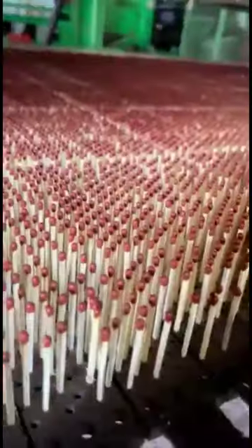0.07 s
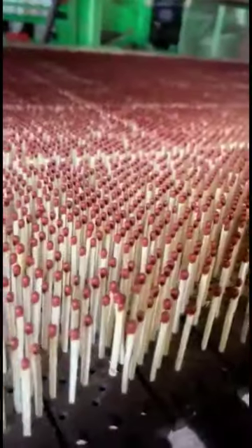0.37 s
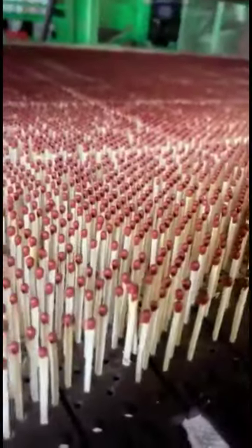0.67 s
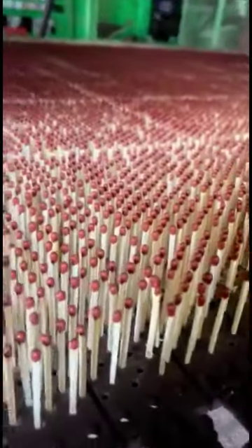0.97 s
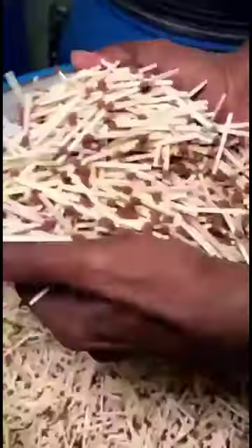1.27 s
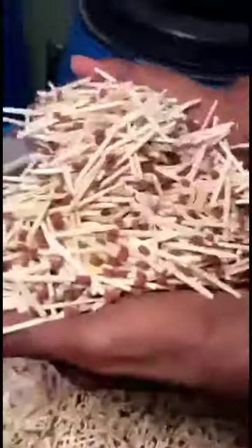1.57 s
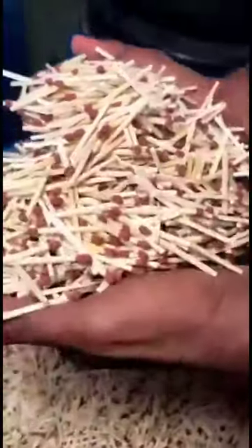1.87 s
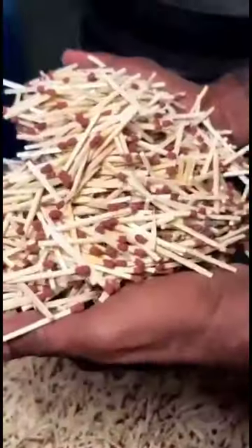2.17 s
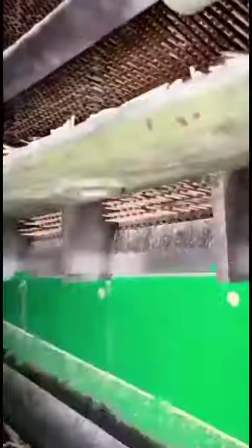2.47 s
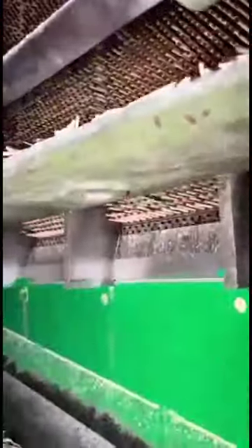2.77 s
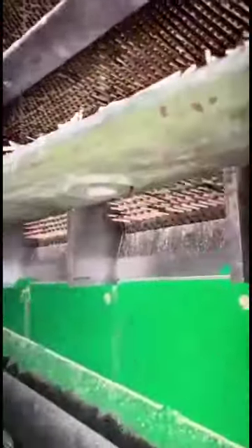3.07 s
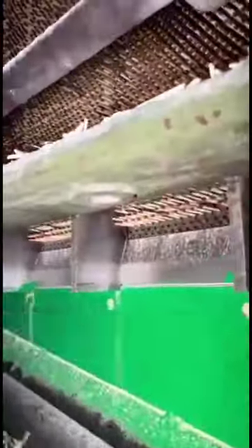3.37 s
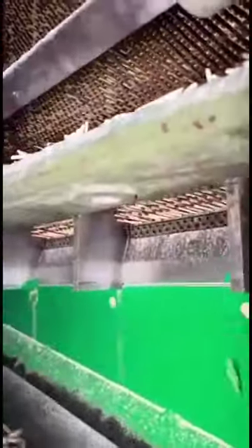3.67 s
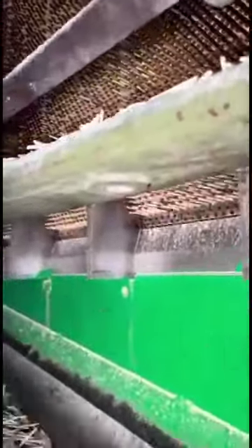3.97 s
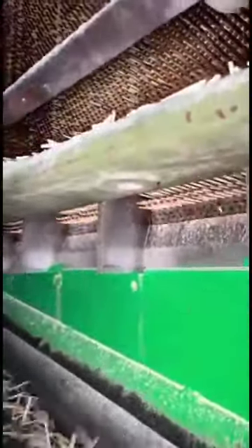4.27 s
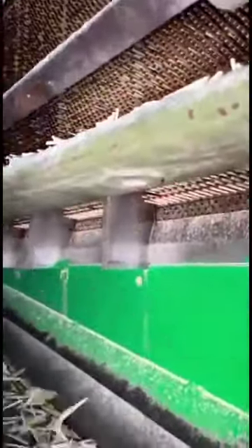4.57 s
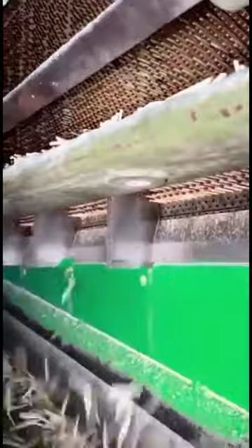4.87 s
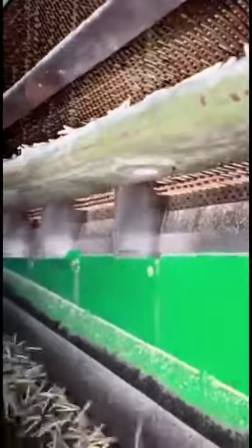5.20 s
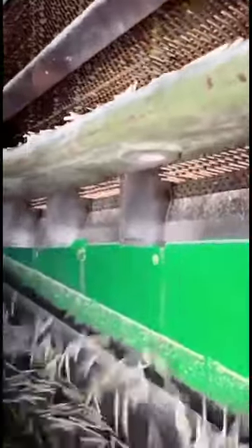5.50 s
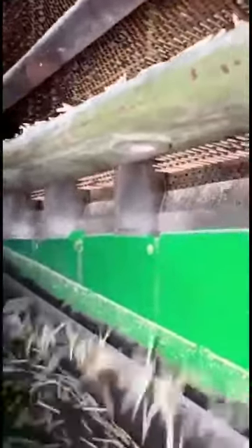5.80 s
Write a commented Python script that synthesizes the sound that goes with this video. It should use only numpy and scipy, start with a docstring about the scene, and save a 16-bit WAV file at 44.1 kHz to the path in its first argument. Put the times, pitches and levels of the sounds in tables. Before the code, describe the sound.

Steady machine clatter fills a factory hall, with a low conveyor hum, scattered knocks and the light rustle of matchsticks under a thin high whine. About halfway through, the microphone is suddenly beside a machine punching matches out of metal plates. It shakes and rattles back and forth in a quick rhythm, with deep thuds, cracking steel hits and ticking sticks. The bass sits in the middle while the highs spread wide.

```python
"""A match factory, three spots in a row: beside the humming conveyor of dipped splints, at a heap of
loose matches lifted by hand, then close to the ejector. Its bar punches rows of matches out of their
plates about three times a second: steel clacks, thuds in the frame and two surges of rattle per stroke.
At the first two spots the machines all round the hall drum and clatter. The stereo microphone hears
the bass in the middle and the treble spread wide."""
import sys
import numpy as np
from scipy import signal
from scipy.fft import rfft, irfft, next_fast_len
from scipy.io import wavfile
from scipy.ndimage import uniform_filter1d

SR = 44100
rng = np.random.default_rng(int(sys.argv[2]) if len(sys.argv) > 2 else 0)


def transcribe(u):
    """Save the signal u as a 16-bit wav file named by the first command-line argument.

    u: samples, shape (n,) or (channels, n), limited to [-1, 1]; the rate is SR.
    q: integer samples, one column per channel.
    """
    v = np.clip(np.atleast_2d(u).T, -1, 1)
    q = np.round(v * 32767).astype(np.int16)
    wavfile.write(sys.argv[1], SR, q)


N = 257544
TIME_S = np.arange(N) / SR
TO_HEAP_S, TO_EJECTOR_S = 1.511, 2.54   # the microphone changes spot

# spectrum of the ejector's chain, plates and splints, close up: frequency_hz, gain_db
EJECTOR_RATTLE = [(500, 11.5), (750, 1), (900, 3), (1500, -1.5), (2000, -4), (2700, -6.5), (3500, -6),
                  (5000, -8), (6300, -10), (7500, -14), (11000, -17.5), (13000, -23), (15500, -33)]


def ejector():
    """Close up: each stroke shakes the frame and sets it rattling, once out and once back."""
    # effort of each stroke in turn: push_shake_db, pull_shake_db, push_rattle_db, pull_rattle_db
    strokes = [(-0.5, 0, -10, 3), (2, 4, 1, -0.5), (1, -2, 0, -2.5), (-2, 0.5, 1, 0.5), (-2.5, 2.5, 0, -1),
               (0, -0.5, 1, -1), (0, 2, -2, -0.5), (1, -3.5, -2, -6.5), (0.5, -1, 0.5, 2.5),
               (0, 3.5, -1, 0.5), (2, 1, -0.5, -4.5)]
    # spectrum of the drumming frame: frequency_hz, gain_db
    frame_spectrum = [(94, -27), (160, 6.5), (174, 0.5), (205, -13.5), (258, -7), (296, -8), (344, -9.5),
                      (373, -8.5), (443, -19), (527, -15), (773, -18), (900, -17.5), (1170, -55),
                      (1980, -120)]
    # rests between surges: centre_s, depth_db, half_width_s
    lulls = [(3.04, -3.5, 0.045), (4.45, -1, .02), (4.785, -4, 0.033), (5.07, -3.5, .022),
             (5.57, -2, 0.025)]
    shake_db, rattle_db = np.transpose(strokes)[:2], np.transpose(strokes)[2:]
    bass = frame_bass(shake_db)
    drum = contacts(frame_spectrum, per_s=73, size_db=1.5, t60=0.022, wash_db=3)
    drum = steady(cut(cut(drum, 207, "high"), 694, "low", order=6), span_s=0.0333)
    drum *= stroke_gain(shake_db, rest_db=-26.5, out_db=-24.5, back_db=-23.5, lags_s=(0.014, 0.15),
                        attack_s=0.027, hold_s=0.055, release_s=0.072)
    rattle = ejector_rattle(rattle_db)
    lull_db = sum(db * np.exp(-((TIME_S - s) / width) ** 2) for s, db, width in lulls)
    judder = from_db(0.8 * drift(rate_hz=17.4) + lull_db)
    return bass + judder * (drum + rattle)


def ejector_rattle(efforts_db):
    """Chain and plates clatter; above them the splints hiss and tick, and the whine swells along."""
    clatter = contacts(EJECTOR_RATTLE, per_s=260, size_db=1, t60=0.06, wash_db=-2)
    clatter = unit(cut(cut(clatter, 667, "high"), 2310, "low"))
    clatter *= stroke_gain(efforts_db, rest_db=-33, out_db=-29.5, back_db=-32.5, lags_s=(0.0015, 0.171),
                           attack_s=0.0089, hold_s=0.056, release_s=0.038)
    hiss = contacts(EJECTOR_RATTLE, per_s=300, size_db=1.5, t60=0.04, wash_db=-1)
    hiss = unit(cut(hiss, 2350, "high")) * pan(1.4)
    ticking = ticks(EJECTOR_RATTLE, per_s=900, size_db=2.2)
    splints = from_db(-0.5) * hiss + from_db(-3.5) * ticking + from_db(4.5) * whine()
    splints *= stroke_gain(efforts_db, rest_db=-34, out_db=-33, back_db=-33.5, lags_s=(0.0028, 0.16),
                           attack_s=0.013, hold_s=0.039, release_s=0.061)
    return clatter + splints


def frame_bass(efforts_db):
    """Low down the ejector's blows merge into a floor rumble and an unevenly throbbing drone."""
    # spectrum of the shaking frame: frequency_hz, gain_db
    spectrum = [(13, -68), (22, -29), (48, -8), (70, 0.5), (86, 3.5), (113, -9.5), (157, -4.5), (174, -4.5),
                (203, -10), (260, -3.5), (340, -53), (570, -120)]
    # swell of the floor rumble: time_s, level_db
    rumble_swell = [(2.55, -24.5), (2.63, -25), (2.67, -17.5), (2.75, -39), (2.88, -23), (3.12, -41),
                    (3.14, -29), (3.31, -27), (3.33, -33), (3.5, -25), (3.62, -30), (3.64, -39),
                    (3.74, -26), (4.75, -29), (4.8, -47), (4.85, -25), (5.83, -29), (5.84, -28)]
    # swell of the drone: time_s, level_db
    drone_swell = [(2.55, -21), (2.63, -16.5), (2.67, -37), (2.72, -19), (2.79, -26), (2.83, -17),
                   (3.04, -29), (3.1, -17), (3.63, -22.5), (3.65, -28), (3.7, -22.5), (3.88, -18),
                   (3.91, -38), (3.96, -20.5), (5.03, -23.5), (5.08, -36), (5.11, -22), (5.84, -21)]
    shaking = colour(wide_noise(), spectrum)
    rumble_db = in_time(rumble_swell)
    rumble = steady(cut(shaking, 129, "low", order=6), span_s=0.046)
    rumble *= from_db(0.84 * (rumble_db - rumble_db.mean()))
    rumble *= stroke_gain(efforts_db, rest_db=-24.5, out_db=-25, back_db=-24, lags_s=(0.04, 0.167),
                          attack_s=0.032, hold_s=0.021, release_s=0.021)
    drone = steady(cut(cut(shaking, 128.4, "high", order=6), 218, "low", order=6), span_s=0.064)
    throb_db = 1.5 * drift(rate_hz=42)
    return rumble + from_db(in_time(drone_swell) - 3 + throb_db) * drone


def stroke_gain(efforts_db, rest_db, out_db, back_db, lags_s, **shape):
    """A part shakes a little all the time, and surges as the bar goes out and as it comes back."""
    first_s, stroke_s = 2.468, 0.3125
    push_db, pull_db = efforts_db
    starts_s = first_s + stroke_s * np.arange(len(push_db))
    out = surges(starts_s, out_db + push_db, lag_s=lags_s[0], **shape)
    back = surges(starts_s, back_db + pull_db, lag_s=lags_s[1], **shape)
    return np.sqrt(from_db(rest_db) ** 2 + out + back)


def thuds():
    """Heavy blows ring the ejector's frame; the harder, higher ones jolt the loose plates most."""
    # blows in the frame: start_s, level_db, pitch_hz
    blows = [(2.545, -13, 165), (2.599, -11, 154), (2.659, -12, 440), (2.683, -11.5, 235),
             (2.714, -17, 228), (2.73, -10, 150), (2.741, -13, 266), (2.822, -15, 165), (2.832, -12, 341),
             (2.865, -15, 150), (2.958, -8, 354), (3.128, -16.5, 215), (3.209, -11.5, 154),
             (3.268, -9, 345), (3.311, -15.5, 570), (3.38, -12, 266), (3.449, -14, 164),
             (3.461, -12.5, 341), (3.507, -14, 235), (3.583, -15, 165), (3.594, -13, 330),
             (3.706, -12.5, 165), (3.832, -9, 165), (3.903, -15, 311), (3.94, -12, 320), (3.97, -11.5, 340),
             (4.078, -13.5, 164), (4.088, -8.5, 260), (4.218, -13.5, 360), (4.245, -18.5, 509),
             (4.517, -7.5, 265), (4.541, -19, 221), (4.556, -13.5, 520), (4.59, -14, 149),
             (4.599, -11, 362), (4.72, -10, 171), (4.846, -11, 165), (4.901, -16, 258), (4.966, -11, 165),
             (5.347, -16, 283), (5.455, -7, 290), (5.507, -8, 420), (5.625, -11, 160), (5.658, -11, 254),
             (5.724, -14, 166), (5.785, -13, 295)]
    # modes of the frame: pitch_hz, gain_db, t60_s
    frame_modes = [(163.2, -1.5, 0.17), (233.7, 0.5, 0.087), (273, -2, 0.078), (336.7, -1.5, 0.11),
                   (377, -3, 0.09), (508, -6.5, 0.08), (558, -4.5, 0.11), (628, -9, 0.073), (860, 5, 0.077)]
    s, db, pitch_hz = np.transpose(blows)
    plates = unit(cut(colour(wide_noise(), EJECTOR_RATTLE), 2300, "low", order=2))
    shaken = fade(strikes(s, from_db(db) * pitch_hz / pitch_hz.max()), t60=0.21)
    return struck(blows, frame_modes, scatter_db=1) + from_db(-15.5) * shaken * plates


def clacks():
    """The bar hits a row of splints: a ragged crack, a short ring of steel, a tail in the housing."""
    # hits of the bar, each snapping in two broad resonances:
    # start_s, crack_db, low_hz, low_db, high_hz, high_db, width_hz, left_minus_right_db
    bar_hits = [(2.947, -27, 3000, -31, 4000, -33, 1200, 0), (3.095, -27.5, 3550, -28.5, 5900, -34, 600, 2),
                (3.398, -27.5, 2680, -22, 5970, -22, 1500, 6), (3.718, -27, 3500, -26, 5000, -33, 700, -2),
                (4.031, -14.5, 3520, -15, 6230, -21.5, 650, 4),
                (4.338, -16, 3600, -22, 4450, -17.5, 950, 0), (4.655, -20, 3400, -26, 6370, -23, 1100, 0),
                (4.962, -22, 3260, -27, 5500, -31, 1100, 0), (5.597, -25, 3530, -28, 6300, -33, 700, -2)]
    # modes of the steel bar: pitch_hz, gain_db, t60_s
    bar_modes = [(3620, -6, 0.07), (4500, 1, 0.028), (5070, 3, 0.05), (6600, -9, 0.03), (12300, -16, 0.027)]
    # spectrum of the crack: frequency_hz, gain_db
    crack_spectrum = [(300, -7), (2600, -1), (3200, -6), (6500, 0), (7800, -4), (8600, 16), (10500, -1),
                      (12000, -3), (15500, -16)]
    s, db = np.transpose(bar_hits)[:2]
    hits = strikes(s, from_db(db))
    burst = np.sqrt(surges(s, db - 1.5, attack_s=0.0005, hold_s=0.004, release_s=0.005))
    direct = burst * rng.standard_normal(N)
    housing = (from_db(-8) * burst + from_db(-15) * fade(hits, t60=0.22)) * rng.standard_normal((2, N))
    crack = from_db(-5) * cut(colour(direct + housing, crack_spectrum), 2300, "high")
    row = fade(hits, t60=0.014) * wide_noise()   # the splints are not met all at once
    steel = from_db(-28) * sum(ring(row * from_db(gain_db), hz, t60) for hz, gain_db, t60 in bar_modes)
    snaps = sum(snap(at, low_hz, low_db, width_hz, pan_db) + snap(at, high_hz, high_db, width_hz, pan_db)
                for at, _, low_hz, low_db, high_hz, high_db, width_hz, pan_db in bar_hits)
    return crack + steel + snaps


def snap(start_s, hz, db, width_hz, pan_db, t60=0.05):
    """A row of splints snaps close to the microphone: a short burst in one broad resonance."""
    mid, side = rng.standard_normal((2, SR // 8))
    grit = (mid + from_db(-9) * side * [[1], [-1]]) * pan(pan_db)
    envelope = from_db(db - 60 * np.arange(len(mid)) / SR / t60)
    band = cut(grit * envelope, [max(hz - width_hz / 2, 100), hz + width_hz / 2], "band", order=2)
    burst = unit(band) * np.sqrt(np.mean(envelope ** 2))
    return np.pad(burst, [(0, 0), (int(start_s * SR), N)])[:, :N]


def jolts():
    """The whole ejector bounces on its feet."""
    # jolts that reach the floor: start_s, pitch_hz, peak_db
    bounces = [(2.652, 57.6, -18), (2.867, 61, -23), (3.499, 60.6, -14.5), (4.085, 69, -21),
               (5.162, 70, -14)]
    return sum(ring(strikes([s], from_db(db)), hz, t60=0.46) for s, hz, db in bounces)


def squeaks():
    """Brief rubs, likely in the guides, excite a narrow resonance."""
    # rubs: centre_s, pitch_hz, level_db, length_s
    rubs = [(2.63, 4230, -32.5, 0.06), (3.308, 6270, -36, 0.032), (5.128, 4100, -32.5, 0.052),
            (5.185, 6300, -35, 0.018)]
    out = np.zeros((2, N))
    for s, hz, db, length_s in rubs:
        envelope = from_db(db) * np.exp(-(2 * (TIME_S - s) / length_s) ** 2)
        out += envelope * unit(ring(wide_noise(), hz, t60=0.012))
    return out


def taps():
    """Bunches of splints knock on the plates: each a dry burst in a broad resonance of its own."""
    # knocks at all three spots: start_s, level_db, pitch_hz
    knocks = [(0.256, -24, 1590), (0.689, -29, 1500), (1.178, -25, 1480), (2.202, -31, 1996),
              (2.745, -23, 1600), (2.78, -26.5, 3730), (2.948, -24, 1700), (3.115, -21.5, 1400),
              (3.428, -20.5, 1200), (3.632, -26, 1700), (3.884, -34, 3040), (4.086, -27, 2600),
              (4.365, -26, 1700), (4.403, -23, 1900), (4.523, -26, 1500), (4.546, -29, 5140),
              (4.56, -28, 1800), (4.828, -29, 3830), (4.872, -28, 1900), (4.944, -26, 3450),
              (5.03, -27, 900), (5.141, -27, 4030), (5.461, -24, 2400), (5.631, -25, 1600)]
    grit = wide_noise()
    bursts = sum(fade(strikes([s], from_db(db)), t60=0.05) * unit(ring(grit, hz, t60=4 / hz))
                 for s, db, hz in knocks)
    return cut(bursts, 6800, "low")


def ticks(spectrum, per_s, size_db, t60=0.032, pitches=48):
    """Splints and pins tick at random, each with a short ring at its own pitch and place."""
    out = np.zeros((2, N))
    for hz in np.geomspace(1100, 7400, pitches) * (1 + rng.normal(0, 0.012, pitches)):
        when, chance, sign = rng.random((400, 3)).T
        played = np.arange(len(when)) < per_s * N / SR / pitches
        heights = played * np.sign(sign - 0.5) * from_db(size_db * -np.log(chance + 0.03))
        clicks = strikes(when * N / SR, heights)
        angle = rng.uniform(-0.35, np.pi / 2 + 0.35)
        place = np.array([[np.cos(angle)], [np.sin(angle)]])
        out += from_db(at_hz(spectrum, hz)) * np.sqrt(hz) * place * ring(clicks, hz, t60)
    return unit(out)


def conveyor_bumps():
    """Beside the conveyor: its carriers bump over their track and ring its bed."""
    # bumps of the carriers: start_s, level_db, pitch_hz
    bumps = [(0.227, -17, 240), (0.337, -16.5, 181), (0.438, -16.5, 290), (0.556, -19, 170),
             (0.597, -18, 181), (0.673, -18.5, 210), (0.729, -13.5, 220), (0.753, -18, 350),
             (0.845, -17, 210), (0.862, -15, 320), (1.108, -13.5, 280), (1.153, -14.5, 290),
             (1.31, -17, 230), (1.366, -19, 260), (1.45, -18.5, 160), (1.476, -12, 210)]
    # modes of the bed: pitch_hz, gain_db, t60_s
    bed_modes = [(181, -1, 0.102), (239, -2, 0.07), (338, -3.5, 0.086), (420, -7.5, 0.073),
                 (552, -6, 0.083), (654, -12, .07), (845, -16, .06)]
    return struck(bumps, bed_modes, scatter_db=0.5)


def conveyor_drive():
    """The conveyor's drive hums and throbs over a low rumble in the floor."""
    # wandering pitch of the hum: time_s, pitch_hz
    hum_pitch = [(0.0, 86.5), (0.37, 93.7), (0.68, 84.4), (0.74, 83.8), (0.85, 88.8), (1.31, 86.3),
                 (1.46, 94.5), (1.6, 87.8), (2.21, 88.2), (2.37, 84), (2.54, 92.5)]
    # the hum from beside the conveyor: time_s, level_db
    hum_at_conveyor = [(0.0, -18), (0.036, -44), (0.104, -21), (0.324, -36.5), (0.526, -19), (0.604, -34),
                       (0.66, -25), (0.86, -28.5), (0.906, -35), (0.96, -25.5), (1.214, -30), (1.328, -23),
                       (1.444, -46), (1.5, -29)]
    # the hum from the heap: time_s, level_db
    hum_at_heap = [(1.52, -33), (1.53, -30), (1.808, -20.5), (1.916, -33), (2.054, -18.5), (2.338, -33),
                   (2.366, -25.5), (2.53, -28)]
    # spectrum of the floor: frequency_hz, gain_db
    floor_spectrum = [(13, -54), (22, -15), (54, -11), (63, -6), (70, 2), (78, -22), (100, -1), (170, -120)]
    phase = 2 * np.pi * np.cumsum(in_time(hum_pitch) + drift(rate_hz=3.5)) / SR
    hum_db = in_time([*hum_at_conveyor, *hum_at_heap]) + 0.2 + 0.77 * drift(rate_hz=9.6)
    hum = np.sqrt(2) * from_db(hum_db) * np.sin(phase)
    return hum + from_db(-34.5) * unit(colour(wide_noise(), floor_spectrum))


def hall():
    """From the conveyor and the heap: machines all round drum and clatter, loose matches rustle."""
    # swell of the din: time_s, level_db
    din_swell = [(0.0, -1), (0.27, -.5), (0.52, -1), (0.74, 0.5), (1.24, 0), (1.35, 1.5), (1.45, -1),
                 (1.6, -1), (1.67, -3), (1.78, -1), (2.21, -0.5), (2.3, -1.5), (2.38, -1), (2.54, 0)]
    # knocks from the machines round about: start_s, drumming_db, clatter_db
    knocks = [(0.205, -24, -42), (0.33, -25, -46), (0.45, -22, -33.5), (0.55, -33, -33), (0.85, -19.5, -49),
              (1.3, -23, -37), (1.345, -36, -31.5), (1.467, -21, -33), (1.559, -28, -47), (1.82, -23, -43),
              (2.07, -27, -42), (2.19, -31, -32.5), (2.345, -30, -30), (2.505, -38, -34)]
    # spectrum of clatter and rustle: frequency_hz, gain_db
    spectrum = [(500, 11), (700, 2), (780, 1), (1200, -3), (2000, -6), (3200, -6.5), (5000, -11),
                (7400, -16.5), (11000, -23), (13000, -26), (15500, -36)]
    din_db, at_heap = in_time(din_swell), after(TO_HEAP_S)
    knock_s, drum_db, clatter_db = np.transpose(knocks)
    drum = hall_drumming(din_db, at_heap, knock_s, drum_db)
    clatter = hall_clatter(spectrum, din_db, knock_s, clatter_db)
    rustle = match_rustle(spectrum) + from_db(2) * whine()
    rustle *= from_db(din_db) * blend(from_db(-37), from_db(-36), at_heap)
    dip_s = 1.505   # the level dips briefly on arriving at the heap, the rustle least
    dip = from_db(-15 * after(dip_s) * np.exp(-((TIME_S - dip_s) / 0.0125) ** 2))
    return dip * (conveyor_drive() + drum + conveyor_bumps() + clatter) + np.cbrt(dip) * rustle


def match_rustle(spectrum):
    """Loose splints touch in a fine rustle, with single ticks standing out."""
    rustle = contacts(spectrum, per_s=220, size_db=2, t60=0.011, wash_db=8)
    return unit(cut(rustle, 2530, "high")) + from_db(-6) * ticks(spectrum, per_s=700, size_db=2)


def hall_drumming(din_db, at_heap, knock_s, knock_db):
    """Impacts in the machines merge into a low drumming, duller at the heap."""
    # drumming from beside the conveyor: frequency_hz, gain_db
    conveyor_spectrum = [(65, -27), (110, 0), (113, -5), (144, -9.5), (161, -5.5), (178, 0.5), (217, -7.5),
                         (251, -4.5), (295, -8.5), (333, -6.5), (504, -13), (650, -13.5), (755, -21),
                         (900, -26), (1170, -61), (1980, -120)]
    # drumming from the heap: frequency_hz, gain_db
    heap_spectrum = [(65, -27), (110, -2), (119, -9), (161, -4), (215, -6.5), (270, -7), (327, -9.5),
                     (361, -14), (387, -9.5), (453, -10.5), (536, -16), (628, -11), (735, -19.5),
                     (900, -41), (1170, -46), (1980, -120)]
    conveyor = steady(contacts(conveyor_spectrum, per_s=130, size_db=-8, t60=0.26, wash_db=13), 0.08)
    heap = steady(contacts(heap_spectrum, per_s=45, size_db=-4, t60=0.055, wash_db=14), 0.043)
    drum = cut(cut(blend(conveyor, heap, at_heap), 117, "high"), 810, "low", order=6)
    din = from_db(din_db) * blend(from_db(-21.9), from_db(-23), at_heap)
    knocks = surges(knock_s, knock_db, attack_s=0.0046, hold_s=0.015, release_s=0.04)
    return np.sqrt(din ** 2 + knocks) * drum


def hall_clatter(spectrum, din_db, knock_s, knock_db):
    """Clatter follows the din; single knocks and the conveyor chain's beat stand out of it."""
    clatter = contacts(spectrum, per_s=150, size_db=3, t60=0.04, wash_db=8)
    clatter = unit(cut(cut(clatter, 857, "high"), 2030, "low"))
    beats_s = np.arange(0.013, TO_HEAP_S, 0.15)   # nearly seven a second
    chain = surges(beats_s, levels_db=-42, attack_s=0.022, hold_s=0.013, release_s=0.029)
    knocks = surges(knock_s, knock_db, attack_s=0.0087, hold_s=0.027, release_s=0.037)
    return np.sqrt(from_db(din_db - 31.5) ** 2 + chain + knocks) * clatter


def whine():
    """Thin high tones that flutter, a little different in each ear."""
    # tones of the whine: pitch_hz, level_db, left_minus_right_db, start_s
    tones = [(8786, -9.5, -4, 0), (9475, -27, 0, 0), (10164, -27, 0, 0), (12575, -36, 0, 0),
             (13609, -34, 0, 4.96)]
    out = np.zeros((2, N))
    for hz, db, pan_db, s in tones:
        gain = after(s) * from_db(db + 2.8 * drift(rate_hz=9)) * pan(pan_db)
        out += gain * np.sin(2 * np.pi * hz * TIME_S + rng.normal(0, 0.3, (2, 1)))
    return np.sqrt(2) * out


def contacts(spectrum, per_s, size_db, t60, wash_db):
    """Random small impacts, each a short burst, over the smooth wash that the hall makes of them."""
    sizes = from_db(size_db * np.minimum(rng.exponential(1, N), 4))
    power = fade((rng.random(N) < per_s / SR) * sizes ** 2, t60)
    envelope = np.sqrt(power / power.mean() + from_db(wash_db) ** 2)
    return colour(spread(envelope * rng.standard_normal((2, N))), spectrum)


def struck(blows, modes, scatter_db, db_per_octave=17.5):
    """Blows ring a body, most of all the modes near their own pitch."""
    s, db, pitch_hz = np.transpose(blows)
    chance_db = rng.normal(0, scatter_db, (len(s), len(modes)))
    out = 0
    for k, (hz, mode_db, t60) in enumerate(modes):
        strength_db = db + mode_db + chance_db[:, k] - db_per_octave * np.abs(np.log2(hz / pitch_hz))
        out = out + (-1) ** k * ring(strikes(s, from_db(strength_db)), hz, t60)
    return out


def surges(times, levels_db, attack_s, hold_s, release_s, lag_s=0):
    """Power of the shaking that follows each shove: it builds up, holds and dies away."""
    age, power = np.arange(SR // 2) / SR - lag_s, np.zeros(N + SR)
    shape = np.clip(age / attack_s, 0, 1) * np.exp(-np.maximum(age - attack_s - hold_s, 0) / release_s)
    for s, gain in np.broadcast(times, from_db(levels_db)):
        start = max(int(s * SR), 0)
        power[start:start + len(age)] += (gain * shape) ** 2
    return power[:N]


def strikes(times, heights):
    out = np.zeros(N)
    out[np.clip(np.round(np.asarray(times) * SR).astype(int), 0, N - 1)] = heights
    return out


def fade(x, t60):
    """Every impulse leaves a dying exponential."""
    return signal.lfilter([1], [1, -from_db(-60 / (t60 * SR))], x + 1e-18)


def ring(clicks, hz, t60):
    """Every click sets a dying sine ringing."""
    r, w = from_db(-60 / (t60 * SR)), 2 * np.pi * hz / SR
    return signal.lfilter([0, np.sin(w)], [1, -2 * r * np.cos(w), r * r], clicks + 1e-18)


def steady(x, span_s):
    """A driven vibration holds its strength from one moment to the next; rms near one."""
    power = uniform_filter1d(x.mean(axis=0) ** 2, max(int(span_s * SR), 2))
    return x / np.sqrt(np.maximum(power, 0) + power.mean() / 20)


def drift(rate_hz):
    """Slow random wander with a spread of one."""
    step, settle = 40, 2000
    r = np.exp(-2 * np.pi * rate_hz * step / SR)
    slow = signal.lfilter([1], [1, -2 * r, r * r], rng.standard_normal(N // step + settle + 2))[settle:]
    return np.interp(np.arange(N) / step, np.arange(len(slow)), slow / np.sqrt(np.mean(slow ** 2)))


def spread(pair):
    """Two unrelated signals become left and right: alike in the bass, diffuse in the treble."""
    # likeness of left and right at the microphone: frequency_hz, correlation
    likeness = [(100, 1), (250, 0.96), (430, 0.79), (620, 0.58), (950, 0.19), (1550, .05), (1900, 0.13),
                (2150, 0.82), (3200, 0.51), (5200, 0.26), (7500, 0.32), (13000, 0.29)]
    hz, alike = np.transpose(likeness)
    alike = np.clip(alike, -0.9, 0.998)
    mid = colour(pair[0], np.c_[hz, 10 * np.log10((1 + alike) / 2)])
    side = colour(pair[1], np.c_[hz, 10 * np.log10((1 - alike) / 2)])
    return np.array([mid + side, mid - side])


def wide_noise():
    return spread(rng.standard_normal((2, N)))


def colour(x, spectrum):
    """Causal (minimum-phase) filter with the given spectrum."""
    size = 2 * next_fast_len(N // 2 + 4096)
    cepstrum = irfft(np.log(from_db(at_hz(spectrum, np.linspace(0, SR / 2, size // 2 + 1)))))
    cepstrum[1:size // 2] *= 2
    cepstrum[size // 2 + 1:] = 0
    return irfft(rfft(x, size) * np.exp(rfft(cepstrum)))[..., :N]


def cut(x, hz, kind, order=4):
    return signal.sosfilt(signal.butter(order, hz, kind, fs=SR, output="sos"), x)


def unit(x):
    """Scale a stereo sound so that its centre has rms one."""
    return x / np.sqrt(np.mean(x.mean(axis=0) ** 2) + 1e-20)


def from_db(db):
    return 10 ** (np.asarray(db) / 20)


def pan(left_minus_right_db):
    return from_db([[left_minus_right_db / 2], [-left_minus_right_db / 2]])


def in_time(points):
    return np.interp(TIME_S, *np.transpose(points))


def at_hz(spectrum, hz):
    points_hz, db = np.transpose(spectrum)
    return np.interp(np.log(hz + 1e-3), np.log(points_hz), db)


def after(s):
    """A 5 ms ramp from zero to one, centred on s."""
    return np.clip((TIME_S - s) * 200 + 0.5, 0, 1)


def blend(first, second, share):
    return (1 - share) * first + share * second


def scene():
    """Conveyor and heap, then close to the ejector; splints tap at all three spots."""
    in_hall = hall()
    close_up = ejector() + thuds() + jolts() + clacks() + squeaks()
    return blend(in_hall, close_up, after(TO_EJECTOR_S)) + taps()


def record(dry):
    """The treble has a hollow near 9 kHz; peaks are rounded and the top is cut."""
    # shape of the treble: frequency_hz, gain_db
    treble_shape = [(7400, 2), (8000, -1.5), (8400, -15), (9600, -11.5), (10100, -3.5), (10500, 3.5)]
    cutoff_hz = 15600
    heard = 1.644 * np.tanh(colour(dry, treble_shape) / 1.535)
    return signal.sosfilt(signal.ellip(10, 0.1, 90, cutoff_hz, fs=SR, output="sos"), heard)


dry = scene()
out = record(dry)
transcribe(out)
```